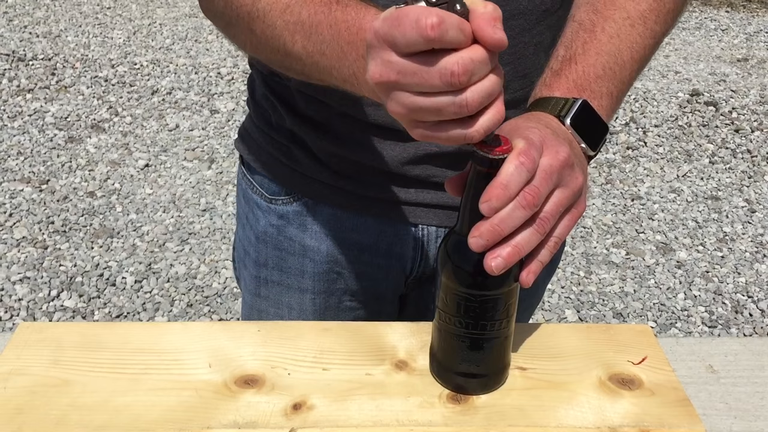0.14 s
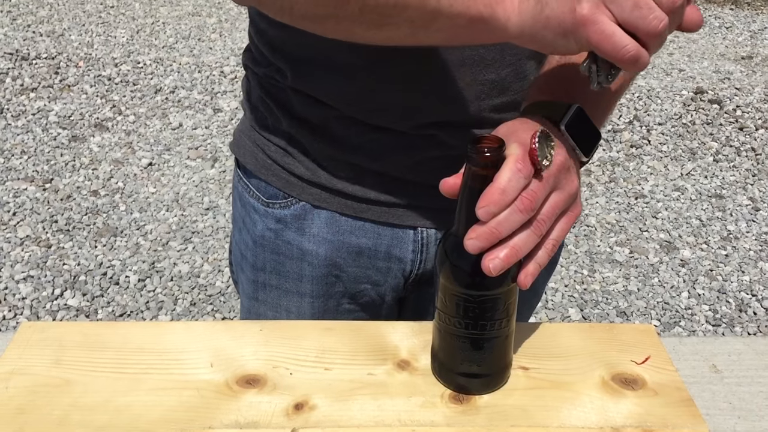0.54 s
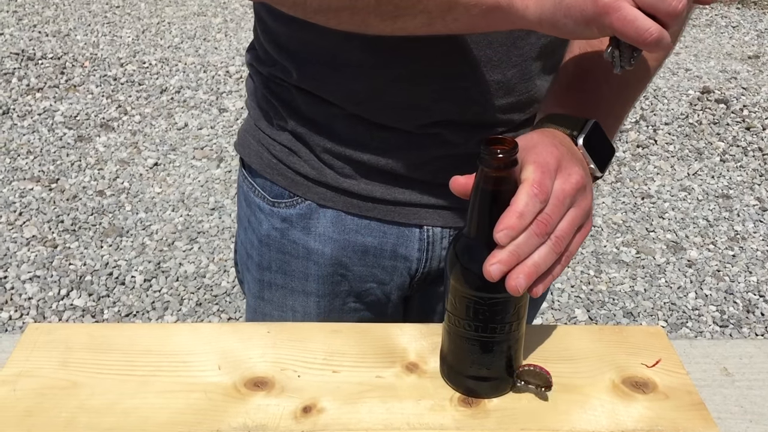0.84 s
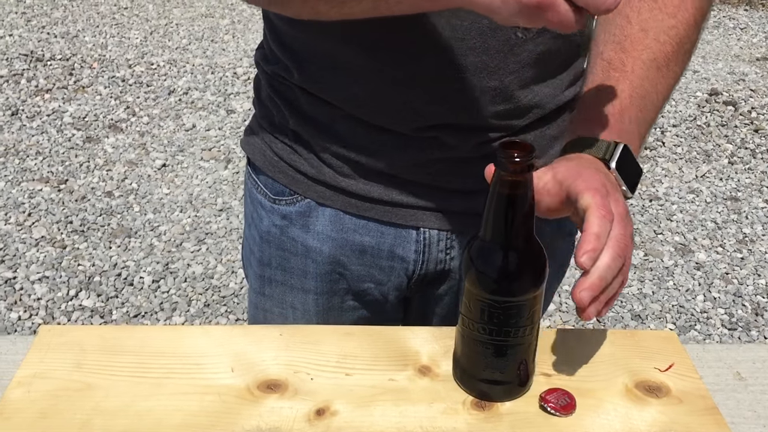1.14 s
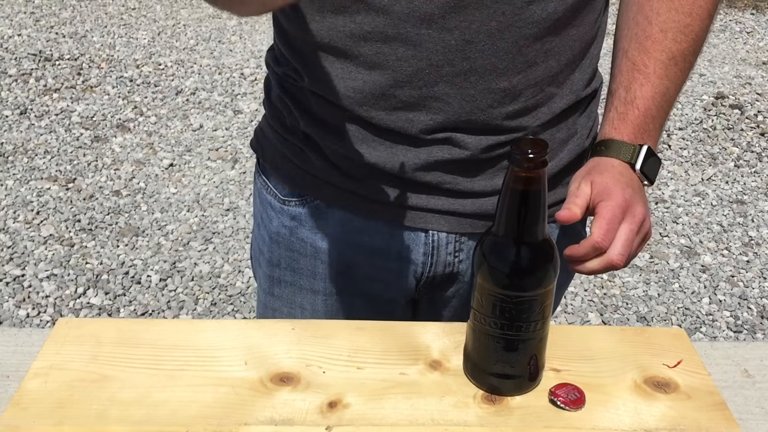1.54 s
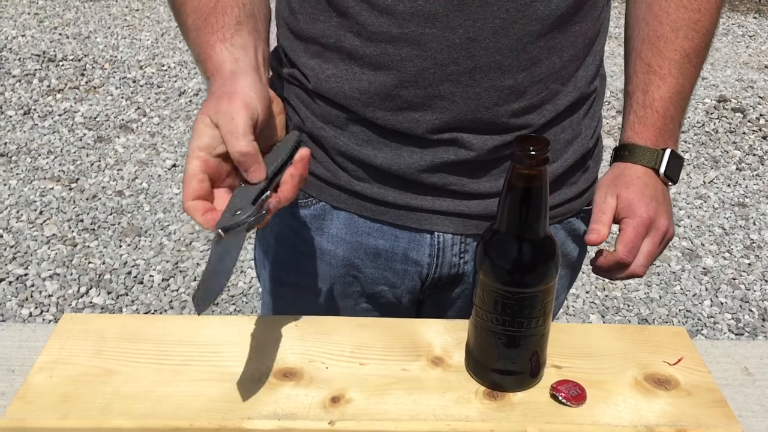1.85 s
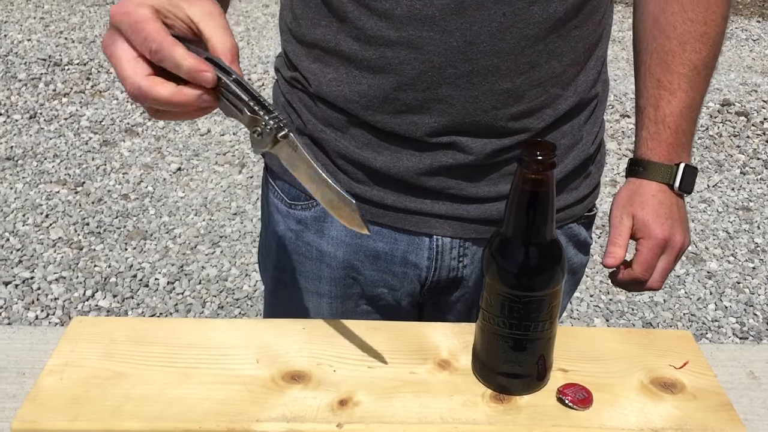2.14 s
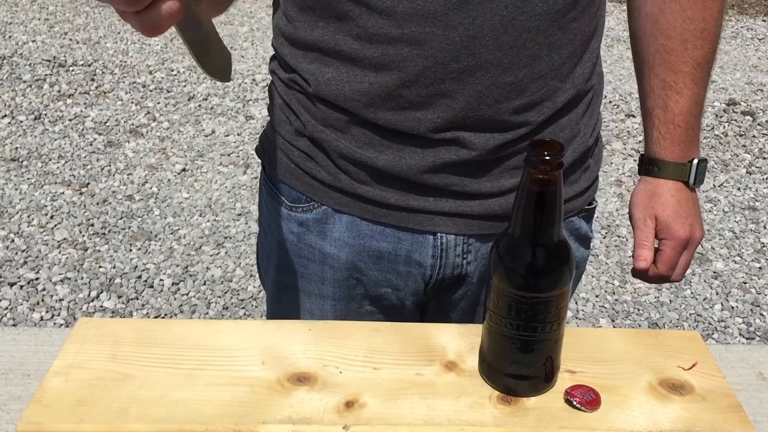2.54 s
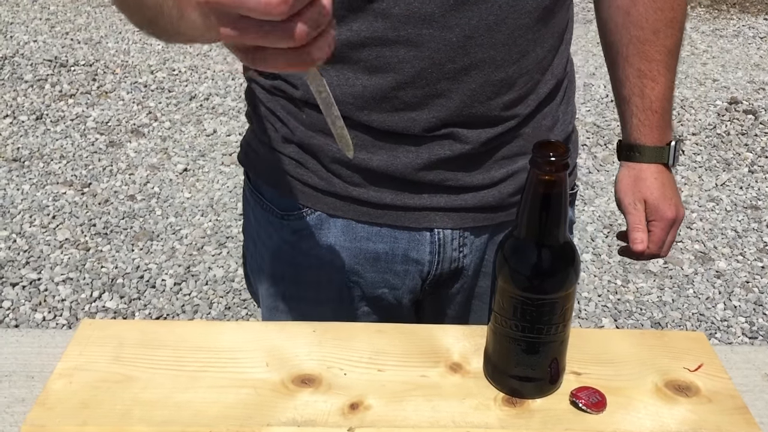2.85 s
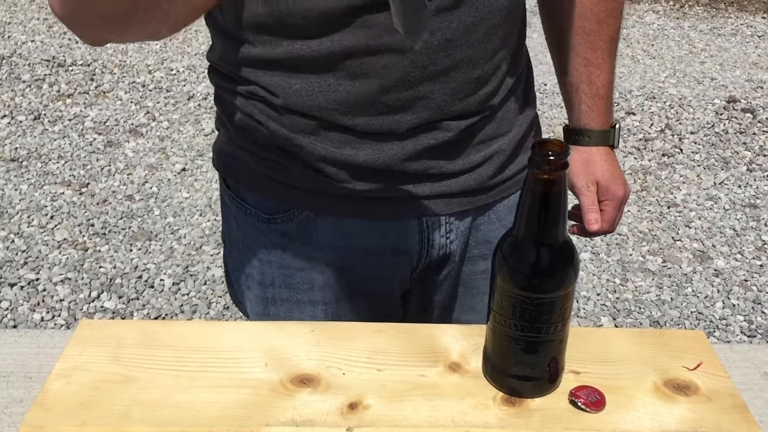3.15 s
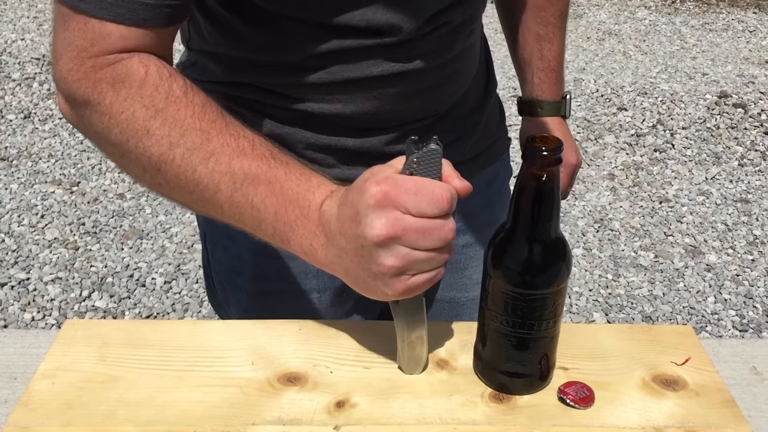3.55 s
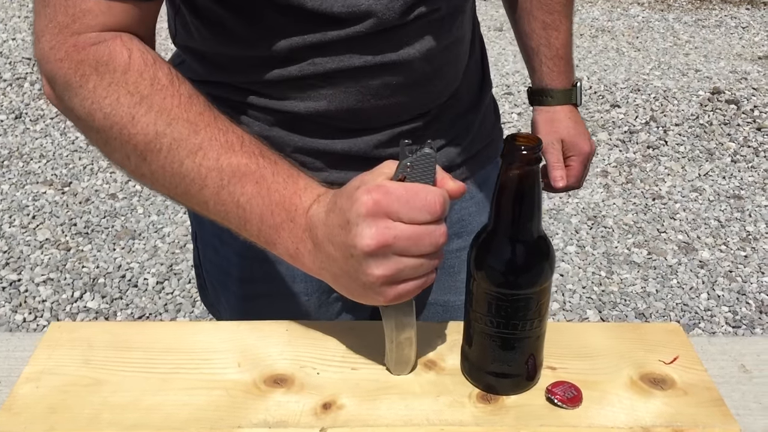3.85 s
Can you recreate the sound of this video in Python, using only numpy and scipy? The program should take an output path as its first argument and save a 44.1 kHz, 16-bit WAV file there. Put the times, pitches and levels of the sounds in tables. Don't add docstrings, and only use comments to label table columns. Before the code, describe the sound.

Bottle cap pried off outdoors: brief gas hiss, metallic scrapes, tinny bounces on a wooden board, then a sharp knife click and a hard stab into wood. Close phone microphone, faint birds and wind.

```python
import sys
import numpy as np
from scipy import signal
from scipy.fft import rfft, irfft
from scipy.io import wavfile
from scipy.ndimage import uniform_filter1d

SR = 44100
rng = np.random.default_rng(int(sys.argv[2]) if len(sys.argv) > 2 else 0)


def rack_gain(trim_db):
    fader = np.asarray(trim_db, float)
    return 10 ** (fader / 20)


def store_pcm(level_fs):
    pcm = np.round(np.clip(level_fs, -1, 1) * 32767).astype(np.int16)
    wavfile.write(sys.argv[1], SR, np.atleast_2d(pcm).T)


N = 176400
STAB_S = 3.556

# start_s, level_db, top_hz
PUFFS = [
    (.52, -28, 131),
    (1.776, -25.5, 189),
    (2.125, -29.5, 111.8),
    (2.599, -28, 111),
    (2.92, -26, 138.4),
    (3.089, -26.5, 249),
    (3.742, -32, 130),
]


def read(points, hz):
    f, value = np.transpose(points)
    return np.interp(np.log(hz + 1), np.log(f + 1), value)


def add(mix, s, sound):
    part = mix[round(s * SR):][:len(sound)]
    part += sound[:len(part)]


def place(make, rows):
    track = np.zeros(N)
    for row in rows:
        add(track, *make(*row))
    return track


def hiss(size, colour_db):
    gain = rack_gain(colour_db(np.fft.rfftfreq(size, 1 / SR)))
    x = irfft(rfft(rng.standard_normal(size)) * gain, size)
    return x / x.std()


def wander(shape, width, axis=-1):
    return uniform_filter1d(rng.standard_normal(shape), size=width, axis=axis)


def bump(hz, octaves):
    return lambda f: np.maximum(-6 * (np.log2((f + 1) / hz) / octaves) ** 2, -80)


def lumpy(hz, octaves):
    lumps = rng.standard_normal(24)
    lump_hz = np.linspace(0, SR / 2, len(lumps))
    return lambda f: bump(hz, octaves)(f) + 3.4 * np.interp(f, lump_hz, lumps)


def ring(modes, db, free_s=9., tilt_db=0., longer=0.94, rise_s=0.00069):
    grip_s = 0.0051
    longest = SR // 2 if free_s < 1 or len(modes) == 1 else SR // 8
    t = np.arange(min(round((free_s + .03) * SR), longest)) / SR
    column = t[:, None]
    hz, level_db, t60_s = np.transpose(modes)
    phase = rng.uniform(-1.2, 1, len(hz))
    level_db = level_db + 1.5 * rng.standard_normal(len(hz))
    decay_db = db + level_db + tilt_db * np.log2(hz / 2500) - 60 * column / (t60_s * longer)
    x = rack_gain(decay_db) * np.sin(2 * np.pi * hz * column + phase)
    x = x * rack_gain(45 * wander(x.shape, 300, axis=0) * (t60_s < .6))
    return x.sum(1) * np.minimum(t / rise_s, 1) ** 2 * np.exp(-np.maximum(t - free_s, 0) / grip_s)


def crack(s, db, hz, t60_s=0.0093):
    t = np.arange(4096) / SR
    return s, hiss(len(t), lumpy(hz, 1)) * np.minimum(t / 0.00022, 1) * rack_gain(db - 60 * t / t60_s)


def note(s, length_s, db, from_hz, to_hz):
    u = np.arange(0, length_s, 1 / SR) / length_s
    glide_hz = from_hz + (to_hz - from_hz) * u
    return s, rack_gain(db) * np.sin(np.pi * u) ** 0.67 * np.sin(2 * np.pi * np.cumsum(glide_hz) / SR)


def jet():
    # time_s, level_db
    pressure = [
        (0.121, -74),
        (0.14, -64),
        (0.146, -22.5),
        (0.184, -20.5),
        (0.206, -31.5),
        (0.213, -68),
        (.25, -69),
        (.28, -81),
    ]
    # hz, level_db
    colour = [(410, -57), (700, -31), (1520, -17), (5840, -13), (8310, -2), (16000, -5.5)]
    s, db = np.transpose(pressure)
    t = np.arange(SR // 2) / SR
    spit_db = -0.5 * 4 * wander(len(t), 16)
    return hiss(len(t), lambda f: read(colour, f)) * rack_gain(np.interp(t, s, db, -120, -120) + spit_db)


def cap():
    # hz, level_db, t60_s
    free_modes = [(2603, -3, 0.18), (5280, -3.5, 0.16), (7270, 1, 0.1), (9820, -5, .079), (10860, -5, 0.12),
                  (12810, -6, .086), (13300, 8, .036)]
    flat_modes = [(1530, -15, 0.036), (1920, -24, .09), (2590, -17, 0.13), (2765, -10.5, 0.43),
                  (2975, -15, 0.118), (3073, -21, .05), (4920, -2.5, 0.11), (5300, -10.5, 0.21),
                  (5430, -5, 0.07), (7560, -21, .062), (8580, -28.5, .07), (9910, -38.5, 0.149),
                  (13000, -29, 0.073)]
    rim_modes = [(1957, -14.5, 0.39), (3130, -13, 0.3), (3770, -14, .16), (4330, -24, 0.16),
                 (6130, -7.5, 0.11), (7000, -23, 0.21), (7200, -5, 0.089), (8050, -9, 0.17),
                 (9610, -2.5, 0.076), (15400, -2.5, 0.023)]
    shaken_modes = [(4970, -5, .05), (5290, -7.5, 0.063), (5426, -3, 0.06), (7400, -28, 0.032),
                    (9770, -29, .08)]
    pair_side = [0, 0, 1, 0, 0, -1, -1, 0, 1, 0, 0, 0, 0]
    # start_s, ring_db
    free_touches = [
        (0.5391, -44),
        (0.799, -99),
    ]
    rim_touches = [
        (.9493, -34),
        (1.024, -99),
    ]
    shaken_touches = [
        (3.589, -32.5),
        (3.6, -35),
        (3.616, -34),
        (3.624, -40),
        (3.635, -32),
        (3.648, -33),
        (3.657, -40.5),
        (3.667, -56),
        (3.677, -99),
    ]
    # start_s, ring_db, spot_db
    flat_touches = [
        (0.8988, -22, 9),
        (0.9486, -31, 3),
        (1.0231, -22.5, -1),
        (1.071, -33.5, 2.5),
        (1.118, -28.5, -3.),
        (1.1319, -34, 2.5),
        (1.1679, -34, -5),
        (1.181, -44, -1),
        (1.193, -99, 0),
    ]
    # hz, level_db, t60_s
    rattle = [(3300, 4.5, 0.0064), (4170, 0, 0.0067)]
    lever = [(4790, 6, 0.0051)]
    # start_s, level_db
    slips = [
        (0.408, -43),
        (.4365, -39),
        (.4455, -36),
        (.4595, -32),
        (.531, -37),
    ]
    out = np.zeros(N)
    for modes, touches in ((free_modes, free_touches), (rim_modes, rim_touches), (shaken_modes, shaken_touches)):
        for (s, db), (next_s, _) in zip(touches, touches[1:]):
            add(out, s, ring(modes, db, next_s - s))
    for (s, db, spot_db), (next_s, _, _) in zip(flat_touches, flat_touches[1:]):
        modes = [(hz, level_db + side * spot_db, t60_s)
                 for (hz, level_db, t60_s), side in zip(flat_modes, pair_side)]
        add(out, s, ring(modes, db, next_s - s))
    for s, db in shaken_touches:
        add(out, s, ring(rattle, db))
    for s, db in slips:
        add(out, s, ring(lever, db))
    return out


def board():
    # hz, level_db, t60_s
    wood = [(1072, -8.5, 0.042), (1233, -1, 0.045), (1345.4, 2.5, 0.045), (1518.4, 0.5, 0.049),
            (1689, 3.5, 0.023), (2448, 4, 0.027), (3040, -1, .03), (3480, 0.5, 0.0199), (4080, -4, 0.016),
            (6050, -19, 0.015)]
    thud = [(316.6, 1.5, 0.054), (503, -2, 0.051), (191, -4.5, 0.04)]
    # start_s, level_db, tilt_db_per_octave, crack_db
    knocks = [(0.8939, -22, 10, -29.5), (0.8993, -16, 9.5, -14), (1.0235, -22, 16, -28),
              (1.071, -46, 1.5, -49), (1.097, -52.5, 1, -59), (1.118, -33.5, 9.5, -43),
              (1.1305, -36, 8, -41), (1.1676, -43.5, 4, -48.5), (1.182, -43.5, 6.5, -53.5),
              (3.553, -16, 3.5, -20.5), (3.5546, -7, 2.5, -15), (3.558, -8.5, -5, -20.5),
              (3.566, -24.5, -5.5, -33.5), (3.6078, -19, -4, -40.5), (3.6145, -33, -4, -59),
              (3.935, -32.5, 7.5, -40.5)]
    out = np.zeros(N)
    for s, db, tilt_db, crack_db in knocks:
        longer = 0.87 if tilt_db > 2 else 1
        if s > STAB_S + .03:
            longer = 0.58
        rise_s = .0014 if tilt_db < -3.5 else .0008
        add(out, s, ring(wood, db, 9., tilt_db, longer, rise_s))
        add(out, *crack(s, crack_db, 6000, 0.013))
    add(out, STAB_S, ring(thud, -15.0))
    return out


def knife():
    # hz, level_db, t60_s
    lock = [(2035, -2.5, 0.023), (3100, -4, 0.0096), (5700, 5, 0.015), (7960, 4.5, 0.0093),
            (11785, -1.5, 0.0096)]
    blade = [(4320, -4.5, 0.15), (7040, -5.5, 0.28), (8320, -6.5, 0.16), (9180, 3.5, 0.16),
             (10470, -6.5, .1), (11540, -4.5, .09), (12900, -13, 0.15), (13830, -9.5, .13)]
    out = np.zeros(N)
    add(out, 1.7255, ring(lock, -11.5))
    add(out, STAB_S, ring(blade, -35.5, .1))
    return out


def bottle():
    # hz, level_db, t60_s
    glass = [(1160, 3.5, 0.21), (1982, -5.5, 1.24)]
    db, free_s = -25, .385
    out = np.zeros(N)
    add(out, STAB_S, ring(glass, db, free_s))
    add(out, STAB_S + free_s, ring(glass[1:], db - 25.))
    return out


def plop(s, length_s, db, from_hz, to_hz):
    s, tone = note(s, length_s, db, from_hz, to_hz)
    crest = np.sin(np.pi * np.linspace(0, 1, len(tone)) ** 0.65) ** 4
    return s, crest * (tone + rack_gain(db - 10.0) * hiss(len(tone), bump(from_hz * 1.147, 0.28)))


def plops():
    # start_s, length_s, level_db, from_hz, to_hz
    rows = [
        (0.225, 0.028, -49.5, 1240, 1230),
        (0.402, 0.026, -28.5, 1134, 1470),
        (0.478, 0.025, -34, 1830, 1710),
    ]
    return place(plop, rows)


def metal():
    # start_s, level_db, centre_hz, t60_s
    bursts = [(0.402, -43, 9300, .015), (0.406, -43.5, 7000, .02), (.4365, -46, 13500, .008),
              (0.446, -44, 13000, .008), (.4595, -41.5, 9000, .012), (.476, -37, 9400, .012),
              (.487, -47, 12000, .015), (.531, -45.5, 7000, .02), (0.5395, -44, 11000, .025),
              (0.949, -29, 11000, .02), (1.715, -22, 9880, .012), (1.7246, -5.5, 7000, .015),
              (1.727, -20, 6000, .022), (1.772, -52, 4800, 0.096)]
    # start_s, level_db, centre_hz
    ticks = [
        (1.632, -42, 7000),
        (3.532, -46, 2300),
        (3.719, -52, 11000),
        (3.728, -51.5, 9000),
        (3.749, -43, 9850),
        (3.758, -36.5, 6630),
        (3.769, -44, 8000),
    ]
    return place(crack, bursts + ticks)


def rub(s, length_s, db, hz):
    t = np.arange(8192) / SR
    grain_db = 1.4 * 10 * wander(len(t), 100)
    swell = np.sin(np.pi * np.minimum(t / length_s, 1)) ** 0.69
    return s, hiss(len(t), lumpy(hz, 0.69)) * swell * rack_gain(db + grain_db)


def rubs():
    # start_s, length_s, level_db, centre_hz
    rows = [(.401, 0.021, -49, 3550), (.466, .029, -53, 11100), (.412, 0.17, -54.5, 1670),
            (.405, 0.12, -58.5, 5550), (.512, 0.048, -53.5, 5760), (1.61, 0.13, -71, 11050),
            (1.121, 0.074, -51, 3100), (1.8, 0.12, -72.5, 9100), (2.375, 0.039, -80, 13100),
            (2.51, .025, -79, 13100), (2.583, 0.027, -75.5, 12100), (2.632, 0.035, -71.5, 9500),
            (3.525, 0.047, -48, 1610), (3.561, 0.12, -50.5, 4460), (3.752, 0.031, -54, 3300),
            (3.91, 0.051, -63.5, 5100)]
    return place(rub, rows)


def ground_echo(near):
    t = np.arange(8192) / SR
    echo = hiss(len(t), bump(2500, 0.59)) * rack_gain(-60 * t / 0.075) * (t > .002)
    return rack_gain(-29) * signal.fftconvolve(near, echo / np.linalg.norm(echo))[:N]


def bird(s, length_s, db, from_hz, to_hz):
    s, tone = note(s, length_s, db, from_hz, to_hz)
    return s, tone * rack_gain(2.5 * 12 * wander(len(tone), 150))


def birds():
    # start_s, length_s, level_db, from_hz, to_hz
    rows = [(1.522, 0.058, -60.5, 3500, 3400), (1.562, 0.04, -59, 3200, 3050),
            (1.594, 0.052, -52.5, 2720, 2320), (2.023, 0.019, -52, 2330, 2610),
            (2.037, 0.015, -51.5, 2590, 2550), (2.045, 0.025, -52, 2620, 2300),
            (2.151, 0.043, -62.5, 3180, 3100), (2.2, .025, -58.5, 2710, 2350),
            (2.238, 0.014, -66.5, 3500, 3420), (2.263, 0.02, -73.5, 6500, 6800),
            (2.29, .02, -75, 5730, 6200), (2.577, 0.031, -51, 2890, 2560), (2.606, 0.03, -53, 2890, 2560),
            (2.633, .018, -62, 2900, 2880), (2.701, 0.025, -51.5, 2720, 2160),
            (2.72, .022, -54.5, 2330, 2750), (3.059, .045, -62, 2030, 2180),
            (3.109, 0.036, -59, 2216, 3250), (3.145, 0.028, -60, 3300, 3130),
            (3.168, 0.022, -55, 3060, 3040), (3.221, 0.026, -57.5, 2480, 2480),
            (3.435, 0.055, -67, 6280, 6060)]
    return place(bird, rows)


def puff(s, db, top_hz):
    u = np.arange(8192) / SR / 0.044 * top_hz / 120
    fall_hz = 55 + (top_hz - 55) * np.exp(-3 * u)
    wobble = np.sin(2 * np.pi * np.cumsum(fall_hz) / SR)
    wobble = wobble + 0.38 * hiss(len(u), bump(top_hz * 0.62, 0.99))
    return s, rack_gain(db) * wobble * 4 * u * np.exp(-3 * u ** 1.37)


def lull():
    t = np.arange(N) / SR
    return rack_gain(sum(-7. * np.exp(-((t - s - .11) / 0.046) ** 2) for s, _, top_hz in PUFFS if top_hz > 170))


def patchy(x):
    z = signal.stft(x, nperseg=512)[2]
    patches = uniform_filter1d(wander(z.shape, 4, axis=0), size=12, axis=1)
    return signal.istft(z * rack_gain(2.5 * patches / patches.std()), nperseg=512)[1][:N]


def wash():
    # hz, level_db
    colour = [(340, 2), (500, -5), (650, 1.5), (1000, -14), (1300, -7), (2420, -11), (4110, -22.5),
              (16000, -46.5)]
    low_cut = lambda f: -45 * np.maximum(np.log2(340 / (f + 1)), 0)
    steady = hiss(N, lambda f: read(colour, f) + low_cut(f))
    return rack_gain(-59) * patchy(steady) * rack_gain(.8 * hiss(N, bump(4.6, 1.7)))


def hum():
    # hz, width_hz, level_db
    lines = [(57.2, 11, -46), (128.15, 10, -50), (85, 81, -49), (184.8, 120, -58), (298, 36, -61.5)]
    out = np.zeros(N)
    for hz, width_hz, db in lines:
        out += rack_gain(db) * hiss(N, lambda f: -20 * np.log10(1 + (2 * (f - hz) / width_hz) ** 2))
    return out * lull()


def scene():
    near = cap() + board() + knife() + bottle() + plops() + metal() + rubs()
    add(near, 0, jet())
    far = birds() + place(puff, PUFFS) + wash() + hum() + rack_gain(-87.) * rng.standard_normal(N)
    return (near + far + ground_echo(near))[None]


def roll_off(x):
    return signal.sosfilt(signal.butter(12, 16830, fs=SR, output="sos"), x)


def record(dry):
    low_hz, high_hz, limit = 42, 15800, .58
    x = signal.sosfilt(signal.butter(3, low_hz, "high", fs=SR, output="sos"), dry)
    x = limit * np.tanh(x / limit)
    hz = np.fft.rfftfreq(N, 1 / SR)
    x = irfft(rfft(x) * rack_gain(-22. * np.clip((hz - high_hz) / 700, 0, 1)), N)
    return roll_off(x)


dry = scene()
out = record(dry)
store_pcm(out)
```